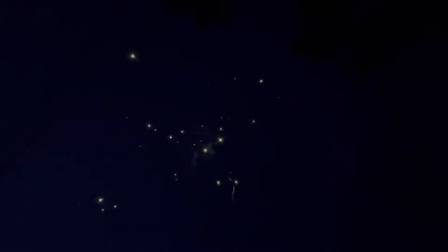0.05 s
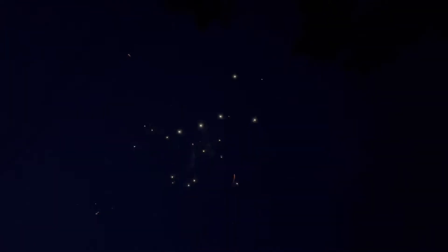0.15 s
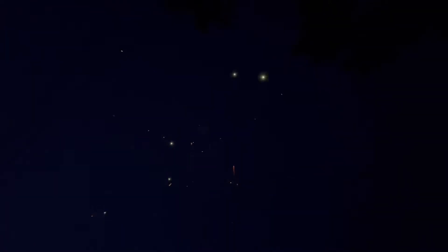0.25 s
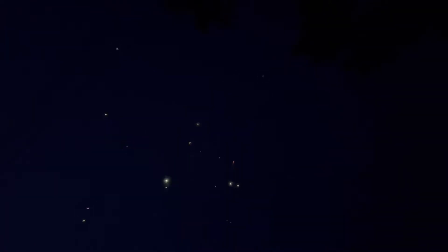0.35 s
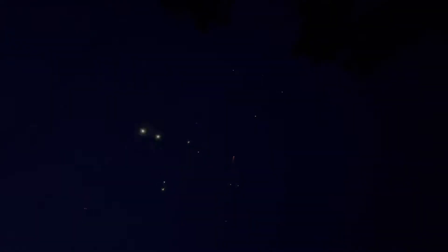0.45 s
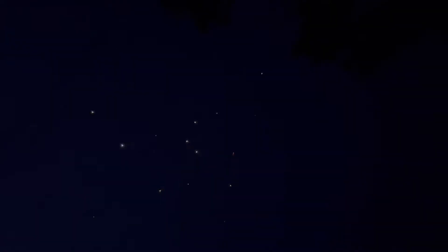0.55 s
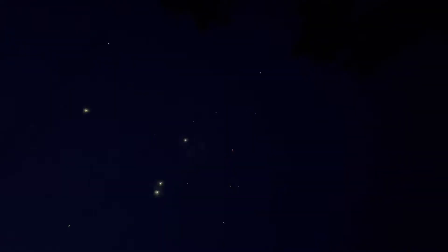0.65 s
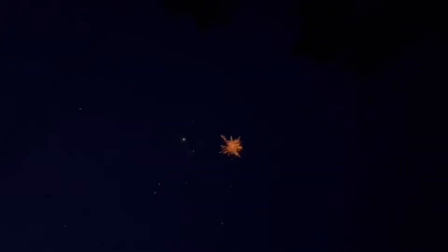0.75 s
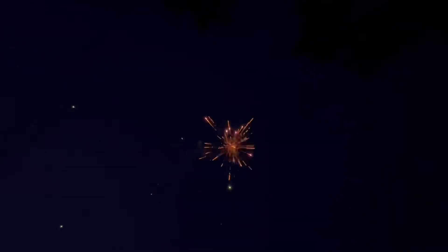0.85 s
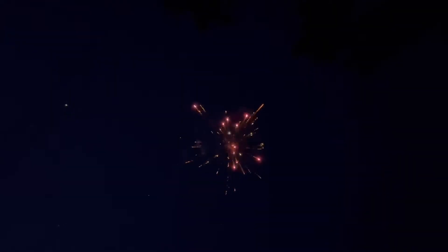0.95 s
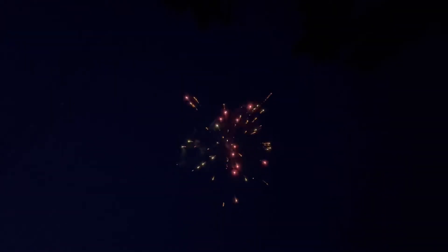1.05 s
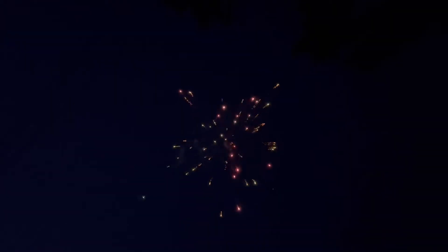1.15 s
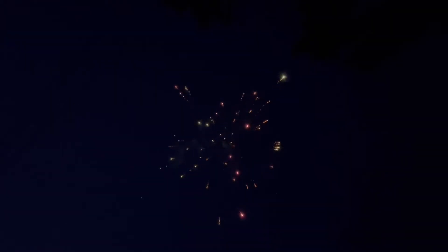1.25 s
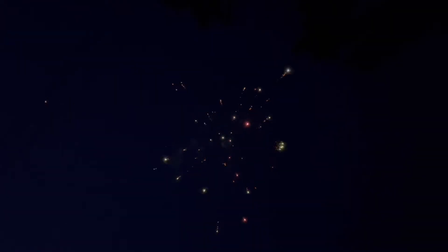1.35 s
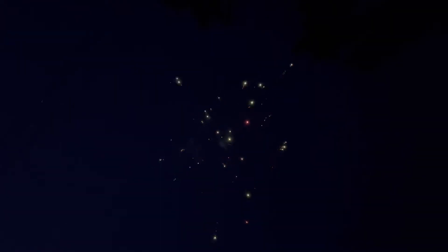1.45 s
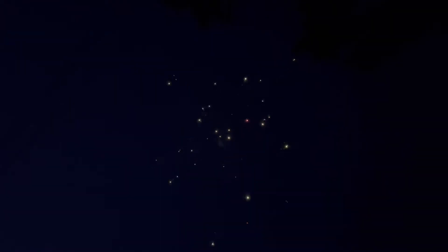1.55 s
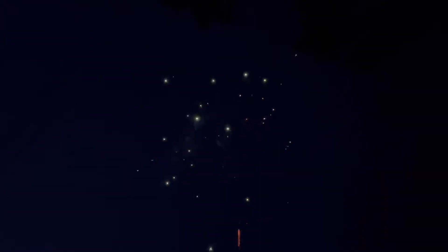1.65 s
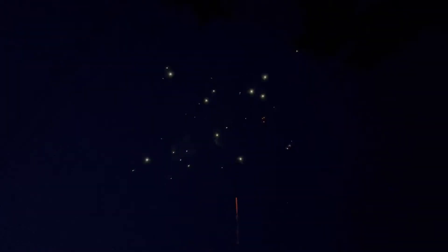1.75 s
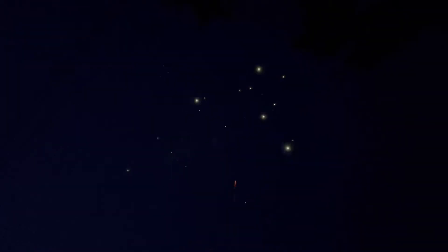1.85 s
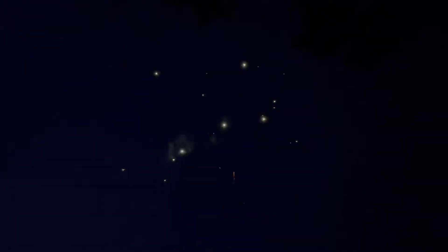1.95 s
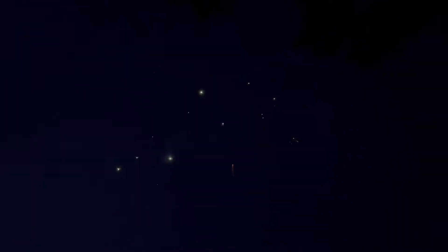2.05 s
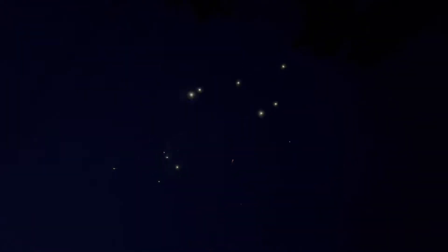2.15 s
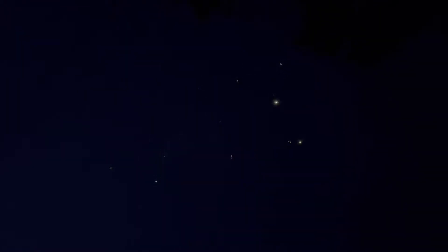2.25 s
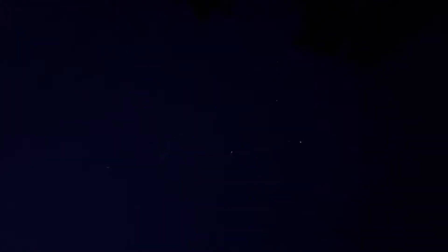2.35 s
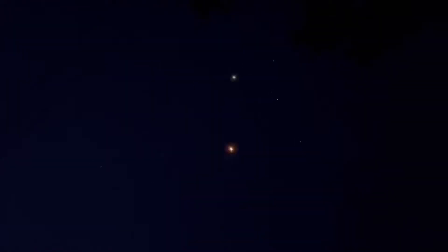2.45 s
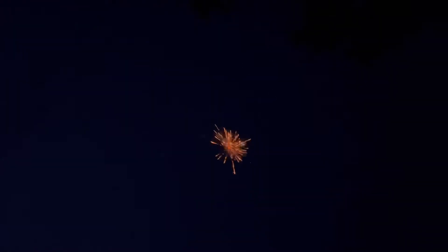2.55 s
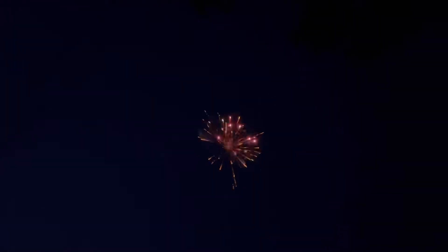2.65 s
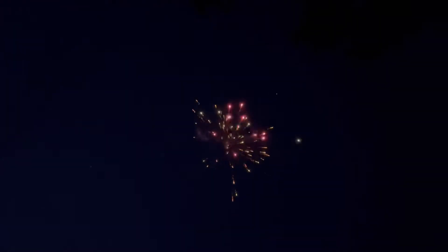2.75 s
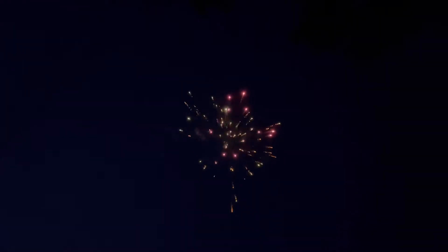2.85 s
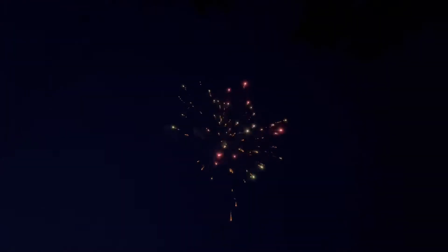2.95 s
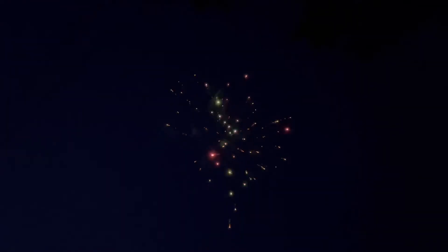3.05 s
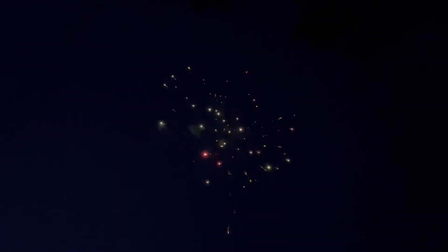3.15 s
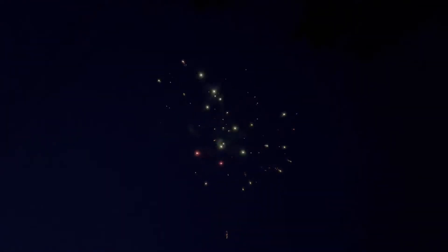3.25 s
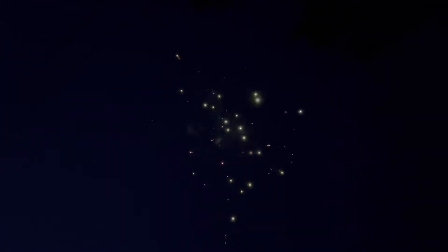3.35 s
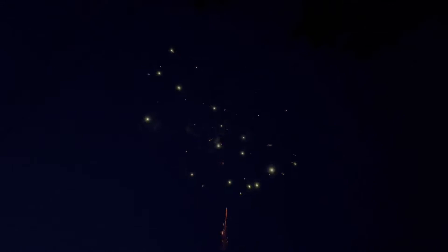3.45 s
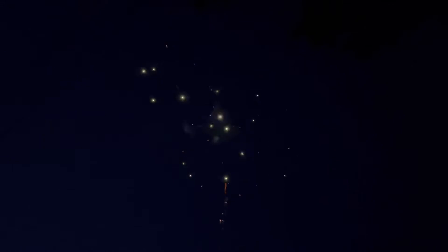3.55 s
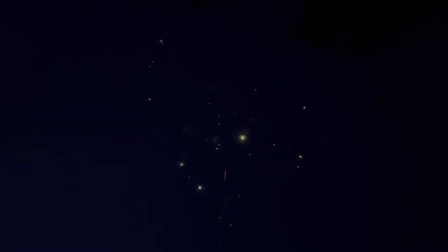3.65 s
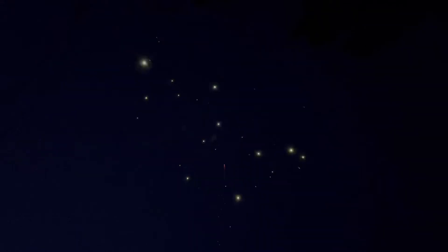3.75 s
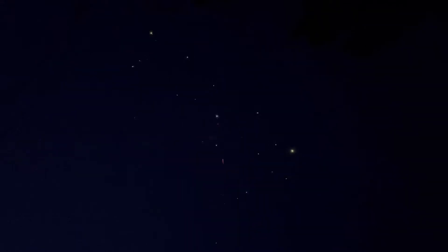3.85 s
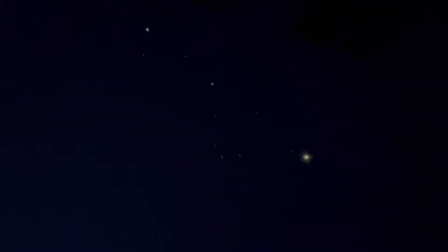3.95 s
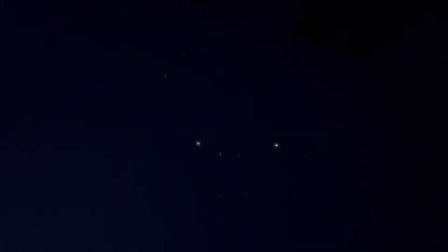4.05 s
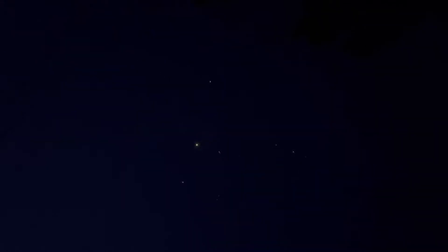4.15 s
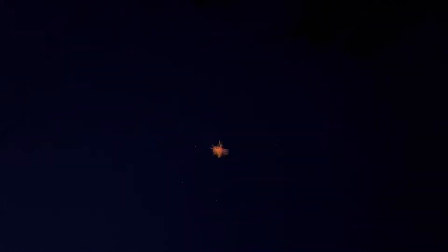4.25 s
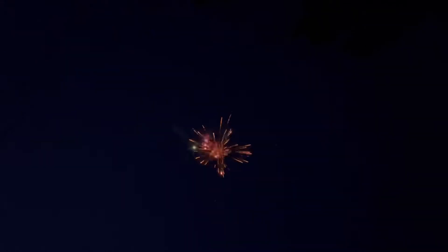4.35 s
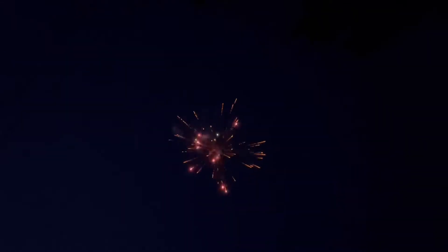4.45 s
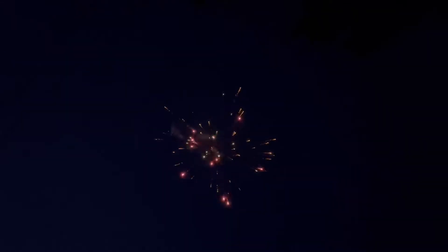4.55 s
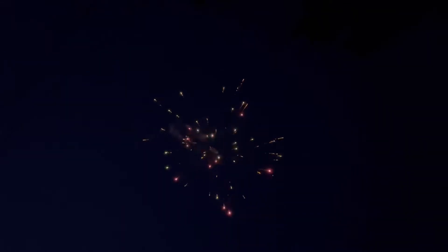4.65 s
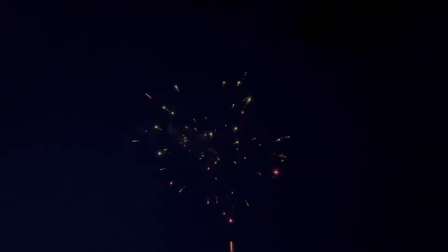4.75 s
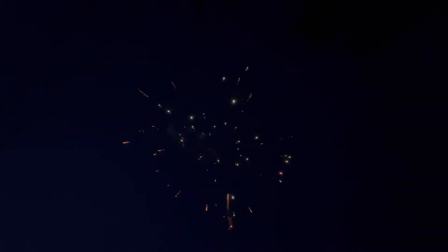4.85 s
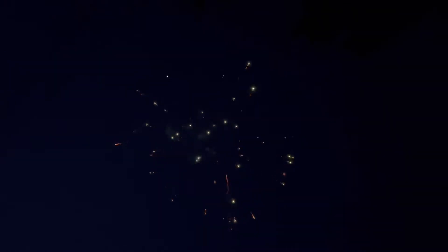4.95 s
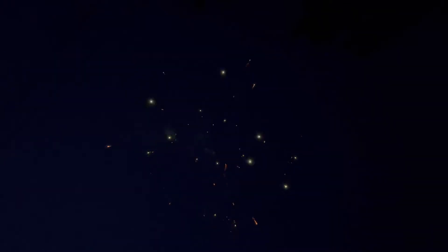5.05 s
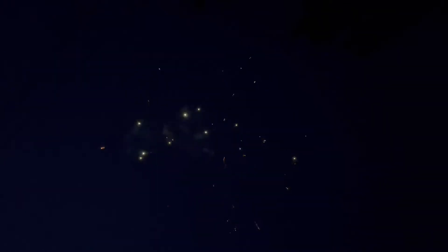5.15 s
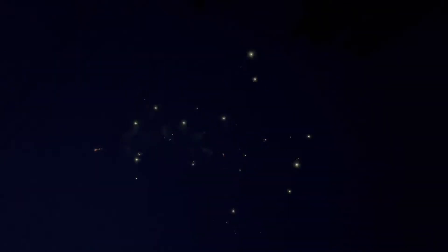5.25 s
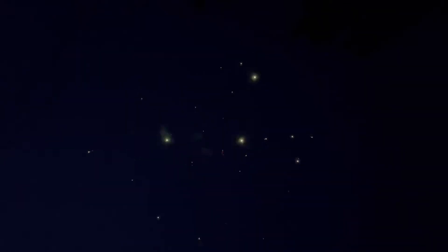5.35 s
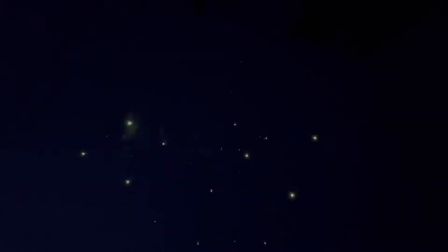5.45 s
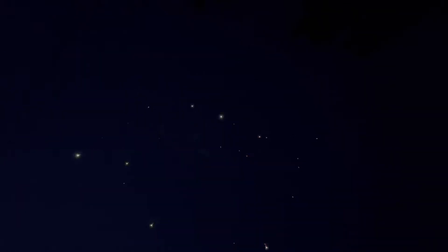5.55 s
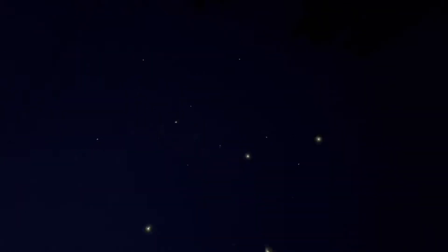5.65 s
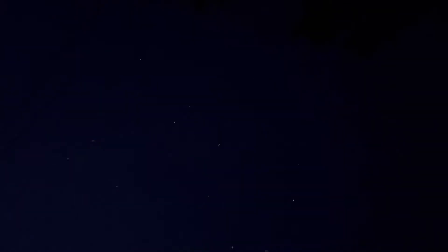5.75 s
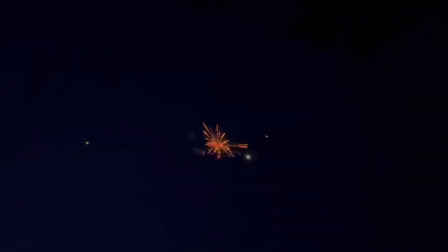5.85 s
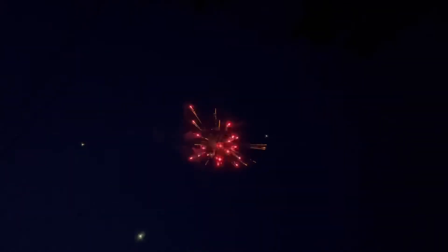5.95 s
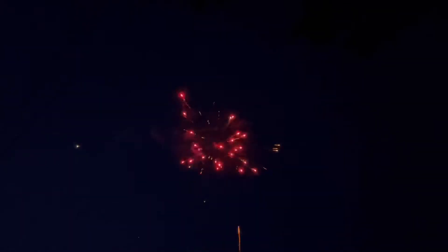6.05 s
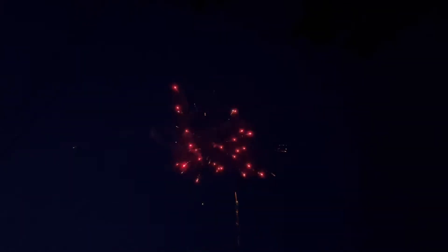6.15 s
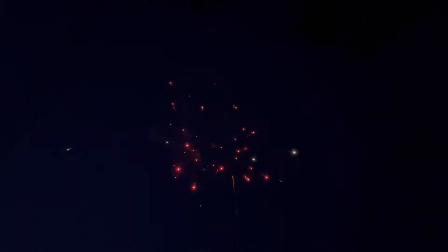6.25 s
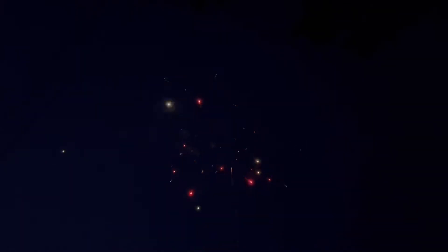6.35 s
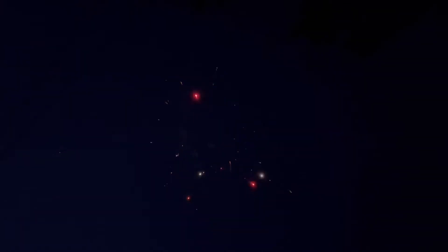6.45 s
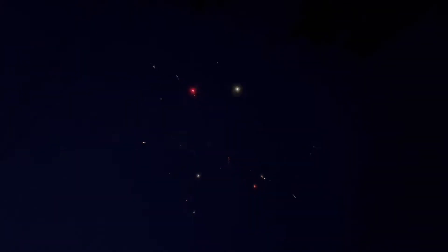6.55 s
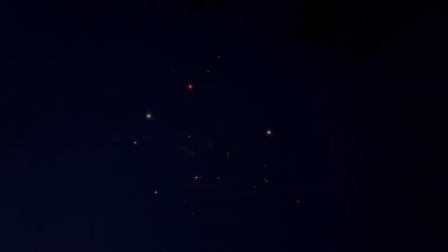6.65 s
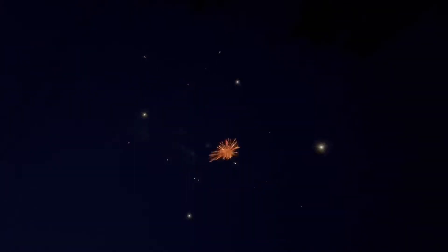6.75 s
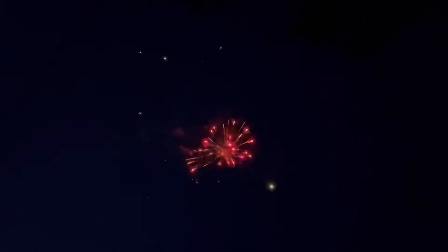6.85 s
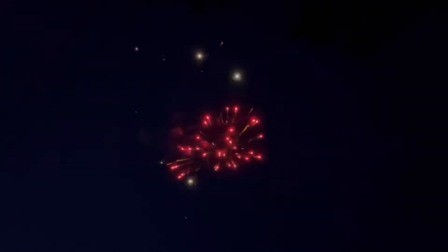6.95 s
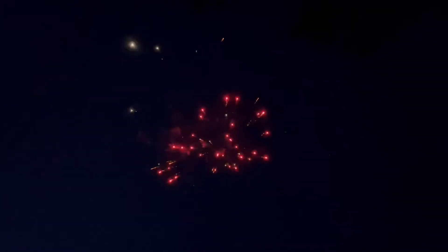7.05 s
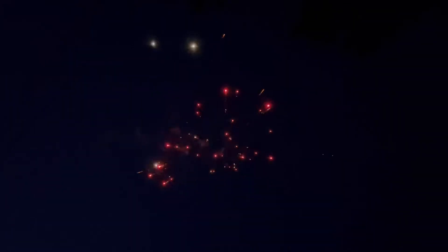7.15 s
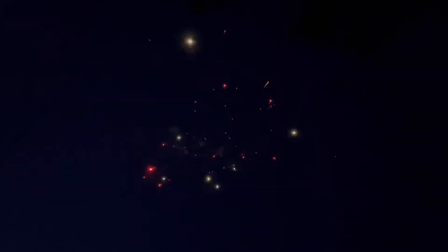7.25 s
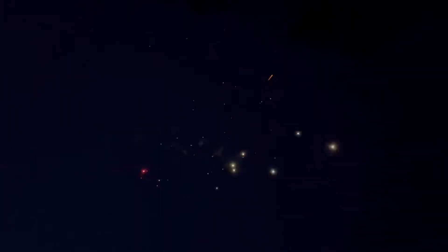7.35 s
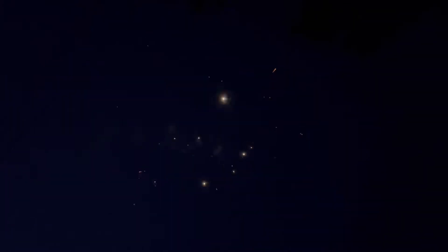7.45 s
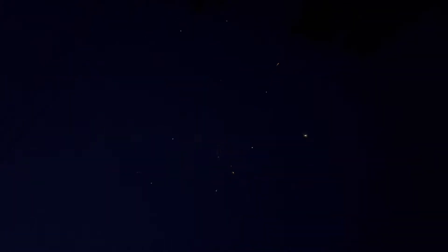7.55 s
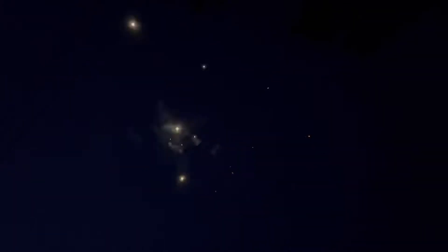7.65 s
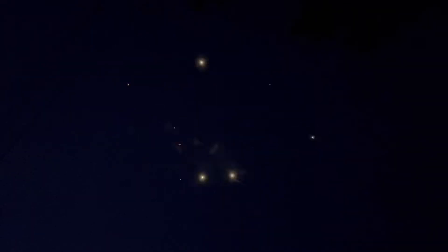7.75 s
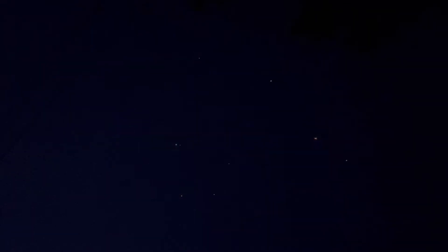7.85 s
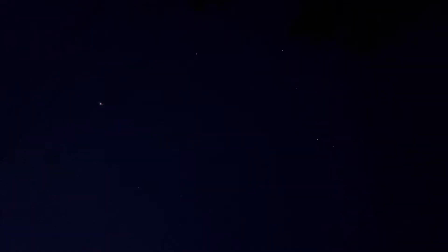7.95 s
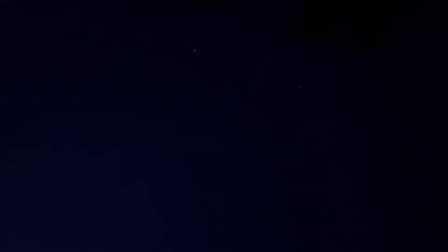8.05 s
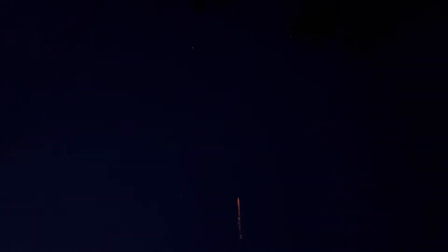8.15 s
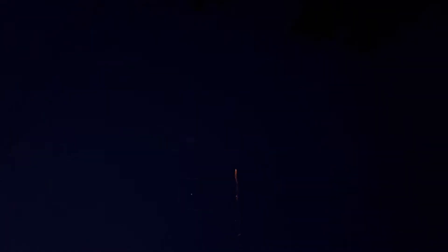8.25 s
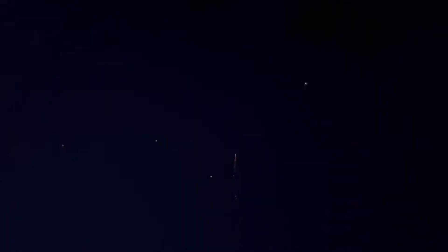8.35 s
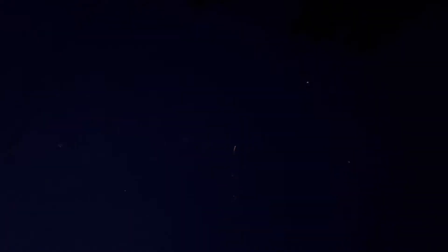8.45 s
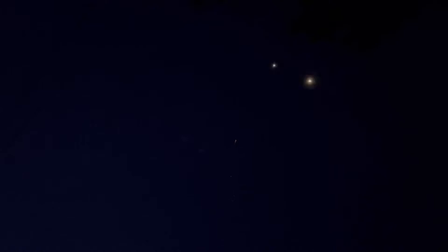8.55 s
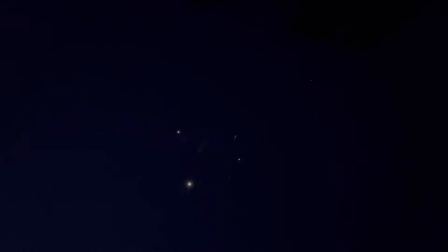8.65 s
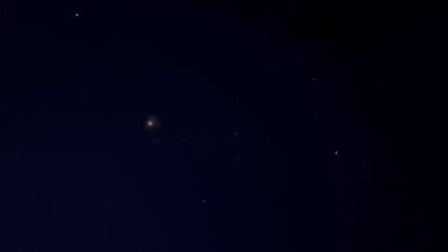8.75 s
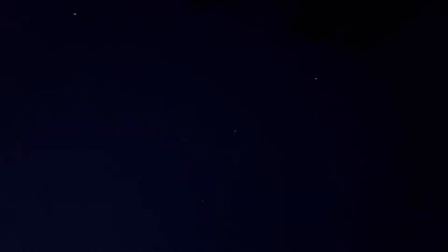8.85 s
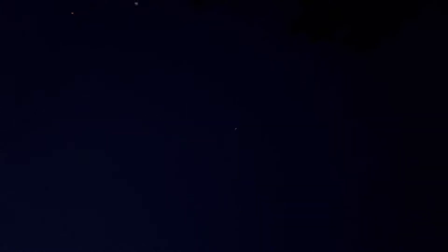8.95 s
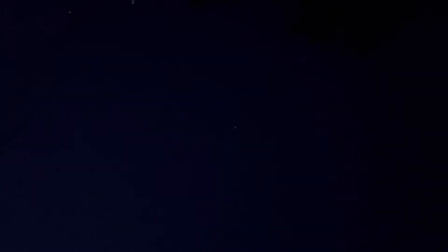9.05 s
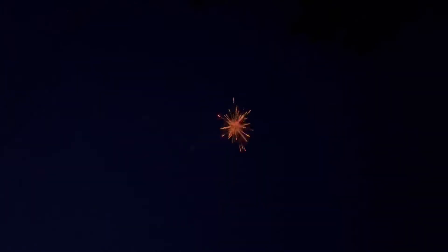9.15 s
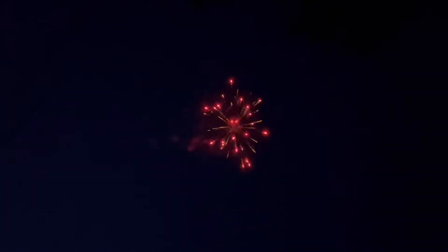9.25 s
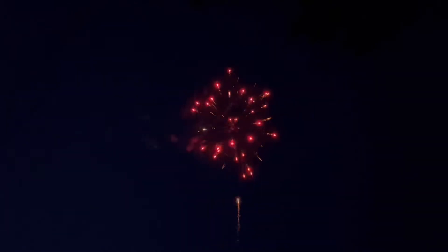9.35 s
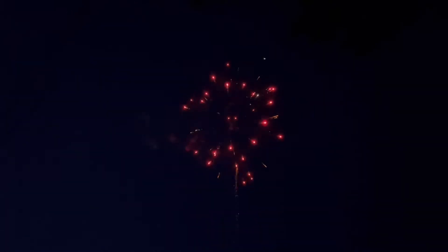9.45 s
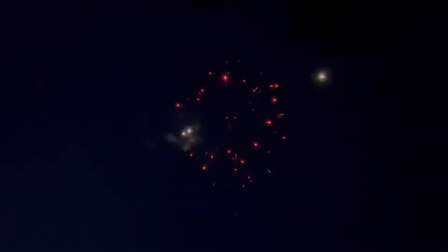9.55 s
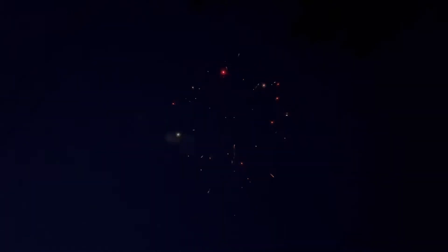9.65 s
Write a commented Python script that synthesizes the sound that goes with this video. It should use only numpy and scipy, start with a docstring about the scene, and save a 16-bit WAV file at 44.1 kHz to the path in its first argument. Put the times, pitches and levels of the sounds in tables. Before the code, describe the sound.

Fireworks shells thump out of their tube and burst overhead with sharp cracks and rolling echoes, ending in a tight cluster of bangs at dusk.

```python
"""A fireworks cake fires at dusk among houses and trees; the roll of an earlier burst opens the scene.
Shells burst overhead: a shock front of clicks and filtered noise, then a roll of decaying noise bands.
Between bursts others leave the tube with a thump that house fronts return as delayed claps.
A distant town murmurs throughout; an engine hums near 3 s, stars tick now and then, a whine rises near 9 s.
The recorder smears every bang into a quick falling chirp through all-passes and rounds its peaks."""
import sys
import numpy as np
from scipy import signal
from scipy.fft import rfft, irfft, next_fast_len
from scipy.io import wavfile

SR = 44100
rng = np.random.default_rng(int(sys.argv[2]) if len(sys.argv) > 2 else 0)


def master(y):
    """Save y as 16-bit WAV."""
    cut = np.clip(np.atleast_2d(y).T, -1, 1)
    pcm = np.round(cut * 32767)  # scale
    wavfile.write(sys.argv[1], SR, pcm.astype(np.int16))


N = 427769
TIME = np.arange(N) / SR
BLAST_TIME = TIME[:SR // 3]

# Shells leaving the tube. Each row: start in seconds, charge level in dB, depth of the thump in dB.
LAUNCH_SHOTS = [(-0.294, 1, 0), (1.4388, -.3, 1.5), (3.2535, 2.8, 13), (4.6045, -.7, 0), (5.8925, -1.5, 2),
                (7.954, -3, -2.5), (9.1765, 0, 7)]


def bursts():
    """Spherical blast overhead: a clean crack, a late ground bounce and a roll equal for every shell."""
    # Shells bursting. Each row: start in seconds, crack level in dB, left minus right in the bass in dB.
    burst_shots = [(-0.95, 0, 0), (0.8162, .5, -1.5), (2.549, .8, 3), (4.3388, 0, 5.5), (5.8813, 0, 6),
                   (6.8002, -.5, 5.5), (9.1865, -3.5, 1)]
    # Colour of the direct blast. Each row: frequency in Hz, gain in dB.
    blast_spectrum = [(25, 17), (50, 31), (76, 41), (100, 34), (250, 29.5), (600, 24.5), (1000, 20),
                      (1500, 15), (2300, 13), (3200, 4.5), (6000, 6), (11500, 1), (13500, -21),
                      (16000, -40)]
    # Relative colour of the rolling tail. Each row: frequency in Hz, gain in dB.
    tail_spectrum = [(25, -49), (60, -29.5), (200, -30.5), (500, -22), (900, -21.5), (1300, -29.5),
                     (2000, -29), (3500, -37), (6000, -38.5), (11500, -42.5), (13000, -65.5),
                     (16000, -77.5)]
    # Dull return from the far landscape, relative. Each row: frequency in Hz, density in dB per Hz.
    far_spectrum = [(25, -30), (60, -12), (250, -14), (600, 0), (950, -2), (1400, -7), (2100, -11),
                    (3500, -27), (12000, -50)]
    far_db, far_rise_s, far_t60_s = -58, .3, 7.5

    shots = [(s, crack_db, 0, left_db) for s, crack_db, left_db in burst_shots]
    crack = blasts(shots, blast_spectrum, lead=1.12, near_db=-14,
                   rag_db=-5.5, rag_t60=.018, rag_hz=1800, rag_lead_s=.0006,
                   ground_s=.0105, ground_db=-3.5, ground_hz=450, garden_db=-6, garden_t60=.2)
    boom = yard_boom(shots, boom_db=21, boom_hz=78, boom_t60=.25)
    equal_shots = [(s, 0) for s, *_ in burst_shots]
    roll = from_db(-.5) * rolling(equal_shots, tail_spectrum, length=.97, rise_s=.01, clump_db=.9)
    far_noise = coloured(diffuse(N), far_spectrum)
    far_noise = far_noise / np.std(far_noise)
    far_roll = from_db(far_db) * far_noise * dying(equal_shots, far_rise_s, far_t60_s)
    return crack + boom + roll + far_roll


def launches():
    """Release of gas at ground level, straight ahead: a ragged thump, its echoes and a short tail."""
    # Colour of the direct blast. Each row: frequency in Hz, gain in dB.
    blast_spectrum = [(25, 11), (50, 23), (90, 31), (250, 31), (500, 21), (850, 13), (1200, 21.3),
                      (2400, 14), (3500, 6), (6000, 6), (8000, -1), (11500, 0), (13500, -24), (16000, -38)]
    # Relative colour of the tail. Each row: frequency in Hz, gain in dB.
    tail_spectrum = [(25, -50.5), (60, -23.5), (250, -27.5), (400, -34), (1200, -31.5), (2000, -30.5),
                     (3500, -37.5), (6000, -40), (11500, -44.5), (13000, -67), (16000, -78.5)]

    shots = [(s, charge_db, depth_db, 0) for s, charge_db, depth_db in LAUNCH_SHOTS]
    thump = blasts(shots, blast_spectrum, lead=1.4, near_db=-10,
                   rag_db=.5, rag_t60=.026, rag_hz=1000, rag_lead_s=.0015,
                   ground_s=.0023, ground_db=-12, ground_hz=1200, garden_db=-5.5, garden_t60=.28)
    boom = yard_boom(shots, boom_db=10, boom_hz=220, boom_t60=.2)
    tail_shots = [shot[:2] for shot in shots]
    tail = from_db(-.7) * rolling(tail_shots, tail_spectrum, length=0.78, rise_s=.009, clump_db=.9)
    return thump + boom + facade_echoes() + tail


def blasts(shots, spectrum, lead, near_db, rag_db, rag_t60, rag_hz, rag_lead_s,
           ground_s, ground_db, ground_hz, garden_db, garden_t60):
    """Superposition: a shock front in a ragged rush of gas, its ground reflection and garden scatter."""
    # a deeper thump has a softer, later front: dB lost and seconds late, per dB of depth
    front_loss, front_late_s = .7, .0001
    out = np.zeros((2, N))
    for s, level_db, depth_db, left_db in shots:
        front = shock_front(left_db, near_db, lead)
        shot = front + (from_db(depth_db) - 1) * one_pole(front, 80, "low")
        bounce = from_db(ground_db) * two_pole(front, ground_hz, "high")
        add(shot, bounce, ground_s)
        add(out, from_db(level_db - front_loss * depth_db) * shot, s + front_late_s * depth_db)
        # small things scatter no bass
        garden = two_pole(scatter(garden_t60), 520, "high")
        add(out, from_db(level_db + garden_db) * garden, s)
        rush = two_pole(scatter(rag_t60), rag_hz, "high")
        add(out, from_db(level_db + rag_db) * rush, s - rag_lead_s)
    return coloured(out, spectrum)


def shock_front(left_db, near_db, lead):
    """Interaural cues on a click with near glances: bass leans aside and leads left, treble leads right."""
    direction_hz = 650  # the microphones tell level direction only in the bass, below about this pitch
    sample = np.arange(len(BLAST_TIME))
    click = np.array([sample == 3, sample == 0]) * 1.0
    front = click + from_db(near_db) * scatter(.012)
    bass = one_pole(front, direction_hz, "low")
    left, right = front + (panned(left_db) - 1) * bass
    return np.array([all_pass(left, hz=220 * lead), all_pass(right, hz=220 / lead)])


def yard_boom(shots, boom_db, boom_hz, boom_t60):
    """Low-frequency reverberation lingers between the nearest walls, more after a deep thump."""
    out = np.zeros((2, N))
    for s, level_db, depth_db, _ in shots:
        add(out, from_db(level_db + .2 * depth_db + boom_db) * scatter(boom_t60), s + .02)
    return two_pole(two_pole(out, boom_hz, "low"), 42, "high")


def rolling(shots, spectrum, length, rise_s, clump_db):
    """Frequency-dependent decay: clumped reflections from ever farther trees and roofs, band by band."""
    # The air takes the treble first. Each row: band centre in Hz, 60 dB decay in seconds before
    # scaling by length.
    band_decays = [(60, 2.7), (250, 1.94), (700, 2.3), (2000, 1.834), (4500, 1.33), (11000, 0.96)]
    size = 2 * next_fast_len(N // 2 + 1)
    noise = rfft(coloured(diffuse(N), spectrum), size)
    out = np.zeros((2, N))
    centres = [hz for hz, t60 in band_decays]
    for (hz, t60), only in zip(band_decays, np.eye(len(band_decays))):
        # triangular bands on a log-frequency axis sum to the whole
        weight = at_hz(list(zip(centres, only)), bins(size))
        band = irfft(noise * weight)[:, :N]
        clumps = from_db(clump_db * flutter(per_s=30))
        out += band * dying(shots, rise_s, t60 * length) * clumps
    return out * from_db(1.1 * flutter(per_s=45) + 1.5 * flutter(per_s=400))


def facade_echoes():
    """Specular reflection: flat walls return thin claps, set in a diffuse blur from the street."""
    # Flat house fronts answering a launch. Each row: delay in seconds, level in dB.
    house_fronts = [(.054, .3), (.3205, -14.7), (.333, -20.5), (.358, -17.5)]
    # Colour of an echo. Each row: frequency in Hz, gain in dB.
    echo_spectrum = [(100, -20), (1000, -9), (2100, 5.5), (3300, -4), (5000, -23), (12000, -32),
                     (16000, -60)]
    # the row of houses answers as one blur
    blur_delay_s, blur_spread_s, blur_db = .298, .11, -14
    out = np.zeros((2, N))
    swell = np.sin(np.pi * np.minimum(BLAST_TIME / blur_spread_s, 1))
    swell_norm = np.sqrt(np.sum(swell ** 2))
    for s, charge_db, _ in LAUNCH_SHOTS:
        for delay_s, echo_db in house_fronts:
            clap = (BLAST_TIME == 0) + from_db(-3) * scatter(.04)
            add(out, from_db(charge_db + echo_db) * clap, s + delay_s)
        blur = diffuse(len(swell)) * swell / swell_norm
        add(out, from_db(charge_db + blur_db) * blur, s + blur_delay_s)
    return coloured(out, echo_spectrum)


def star_ticks():
    """Impulsive radiation: burning stars give tiny bright pops, as band-limited decaying noise."""
    # Faint ticks. Each row: start in seconds, level in dB before the band limits.
    tick_shots = [(2.19, -53), (4.283, -42), (5.17, -50), (8.762, -52)]
    out = np.zeros((2, N))
    for s, level_db in tick_shots:
        add(out, from_db(level_db) * scatter(.04), s)
    return two_pole(two_pole(out, 2500, "high"), 8000, "low")


def background():
    """A diffuse field: the murmur of a distant town, where one engine hums and another whines faintly."""
    # Relative colour of the town. Each row: frequency in Hz, density in dB per Hz.
    town_spectrum = [(45, 0), (65, -5), (95, -3), (140, -7), (185, -10), (260, -26), (500, -24),
                     (1500, -30), (3200, -42), (9000, -44), (12500, -60), (16000, -75)]
    town_db = -66
    rumble_cut = signal.butter(8, 39, "high", fs=SR, output="sos")
    town = signal.sosfilt(rumble_cut, coloured(diffuse(N), town_spectrum))
    hum = far_engine(loudest_s=3.06, swell_s=.24, level_db=-52,
                     from_hz=50, to_hz=75, climb_at_s=2.88, climb_s=.16)
    whine = far_engine(loudest_s=8.9, swell_s=.6, level_db=-82.5,
                       from_hz=406, to_hz=447, climb_at_s=8.89, climb_s=.09)
    return from_db(town_db) * town / np.std(town) + hum + whine


def far_engine(loudest_s, swell_s, level_db, from_hz, to_hz, climb_at_s, climb_s):
    """Frequency modulation: a distant engine's tone swells and fades as its speed climbs to a new level."""
    climb = (1 + np.tanh((TIME - climb_at_s) / climb_s)) / 2
    hz = from_hz + (to_hz - from_hz) * climb
    swell = np.exp(-((TIME - loudest_s) / swell_s) ** 2)
    tone = np.sqrt(2) * np.sin(2 * np.pi * np.cumsum(hz) / SR)
    return from_db(level_db) * swell * tone


def scatter(t60):
    """Exponential decay: a dying spray of tiny reflections with about the energy of a unit click."""
    fade = from_db(-60 * BLAST_TIME / t60)
    return diffuse(len(fade)) * fade / np.sqrt(np.sum(fade ** 2))


def diffuse(size):
    """Interchannel coherence: white stereo noise as it arrives from all sides."""
    # Likeness of diffuse sound at the two microphones. Each row: frequency in Hz, correlation (-1 to 1).
    likeness = [(100, .8), (260, 0.6), (500, 0.12), (1100, -0.27), (2200, 0.3), (3000, -0.12), (5000, 0.17),
                (12000, -0.08)]
    padded = 2 * next_fast_len(size // 2 + 1)
    alike = np.clip(at_hz(likeness, bins(padded)), -.99, .99)
    mid, side = rfft(rng.standard_normal((2, padded)))
    common = np.sqrt((1 + alike) / 2) * mid
    opposed = np.sqrt((1 - alike) / 2) * side * [[1], [-1]]
    return irfft(common + opposed)[:, :size]


def dying(shots, rise_s, t60):
    """Energy addition: echoes of (s, dB) shots rise quickly and die away, and their powers add."""
    age, power = TIME[:3 * SR], np.zeros((1, N))
    fade = from_db(-60 * age / t60) * (1 - np.exp(-age / rise_s))
    for s, level_db in shots:
        add(power, from_db(level_db) ** 2 * fade ** 2, s)
    return np.sqrt(power)


def flutter(per_s):
    """Random modulation: normal knots of unit spread, joined by straight lines."""
    knots = rng.standard_normal(SR // 4)
    return np.interp(TIME * per_s, np.arange(len(knots)), knots)


def coloured(x, spectrum):
    """Minimum phase: a causal filter with the given (Hz, dB) gains, by folding the cepstrum."""
    size = 2 * next_fast_len(x.shape[-1] // 2 + SR // 8)
    cepstrum = irfft(np.log(from_db(at_hz(spectrum, bins(size)))))
    cepstrum[1:size // 2] *= 2
    cepstrum[size // 2 + 1:] = 0
    response = np.exp(rfft(cepstrum))
    return irfft(rfft(x, size) * response)[..., :x.shape[-1]]


def one_pole(x, hz, kind):
    """First-order low- or high-pass, 6 dB an octave."""
    return signal.sosfilt(signal.butter(1, hz, kind, fs=SR, output="sos"), x + 1e-18)


def two_pole(x, hz, kind):
    """Second-order low- or high-pass, 12 dB an octave."""
    return signal.sosfilt(signal.butter(2, hz, kind, fs=SR, output="sos"), x + 1e-18)


def all_pass(x, hz):
    """Phase delay: holds back what lies below a pitch and changes no level."""
    pole = np.exp(-2 * np.pi * hz / SR)
    return signal.lfilter([-pole, 1], [1, -pole], x + 1e-18)


def from_db(db):
    """Logarithmic level: decibels to amplitude gain."""
    return 10 ** (np.asarray(db) / 20)


def at_hz(points, hz):
    """Linear interpolation of (Hz, value) points on a log-frequency axis."""
    known_hz, values = np.transpose(points)
    return np.interp(np.log(np.maximum(hz, 1)), np.log(known_hz), values)


def bins(size):
    """Frequencies in Hz of the discrete Fourier spectrum of a real signal."""
    return np.arange(size // 2 + 1) * SR / size


def panned(left_db):
    """Level-difference stereo: left and right gains, half the difference each."""
    return from_db(np.array([[.5], [-.5]]) * left_db)


def add(out, sound, start_s):
    """Superposition: mix a sound in at a time, which may lie before zero."""
    start = int(round(start_s * SR))
    first, last = max(start, 0), min(start + sound.shape[-1], out.shape[-1])
    if last > first:
        out[:, first:last] += sound[..., first - start:last - start]


def scene():
    """Superposition of launches, bursts and burning stars over the evening background."""
    return launches() + bursts() + star_ticks() + background()


def microphones(x):
    """Port resonance: ridges and notches colour the sound, each microphone a little differently."""
    # Colour of the microphone ports. Each row: frequency in Hz, gain in dB.
    port_colour = [(2300, 0), (2600, 1.5), (2880, -2), (3300, 2), (4300, .5), (4900, -1.5), (6200, 1.5),
                   (7500, -.3), (9000, 3), (9900, 0), (10400, -8), (11000, 0), (12000, 2), (14000, -2.5)]
    # Difference between the microphones. Each row: frequency in Hz, left minus right in dB.
    port_balance = [(400, .5), (1100, -2.5), (2300, .5), (4000, -3), (6500, -7), (9000, 0)]
    size = 2 * next_fast_len(N // 2 + 1)
    hz = bins(size)
    gains = from_db(at_hz(port_colour, hz)) * panned(at_hz(port_balance, hz))
    return irfft(rfft(x, size) * gains)[:, :N]


def dispersed(x, lowest_hz, highest_hz, count):
    """Dispersion: chained all-passes delay each frequency about one cycle, so a click falls in pitch."""
    for hz in np.geomspace(lowest_hz, highest_hz, count):
        x = all_pass(x, hz)
    return x


def record(dry):
    """Dispersion, soft saturation and band limiting: the recorder smears, rounds peaks and cuts the top."""
    smeared = dispersed(microphones(dry), lowest_hz=32, highest_hz=8000, count=14)
    ceiling = .56  # of full scale
    rounded = ceiling * np.tanh(smeared / ceiling)
    # 70 dB down from 17 kHz upwards
    top_cut = signal.cheby2(14, 70, 17000, fs=SR, output="sos")
    return signal.sosfilt(top_cut, rounded)


dry = scene()
out = record(dry)
master(out)
```